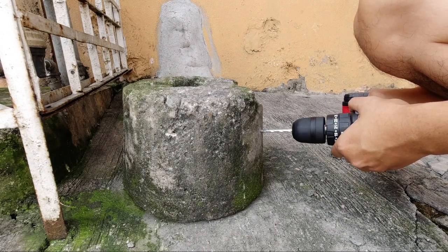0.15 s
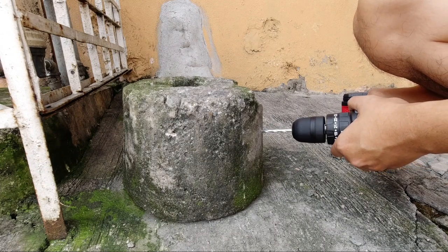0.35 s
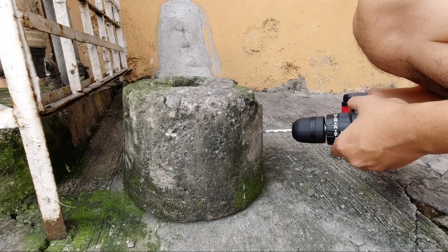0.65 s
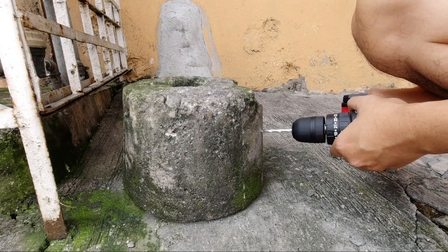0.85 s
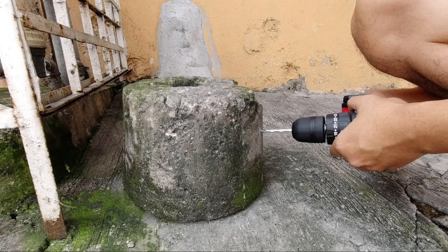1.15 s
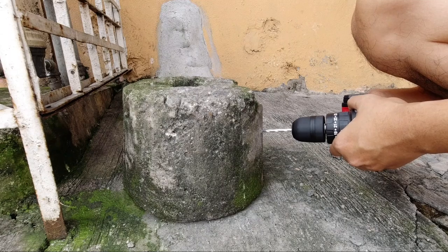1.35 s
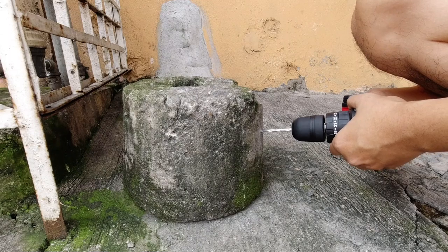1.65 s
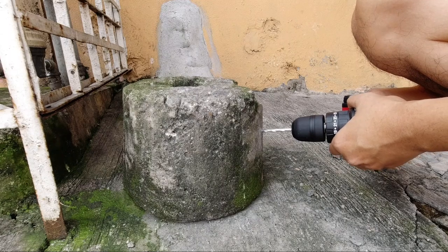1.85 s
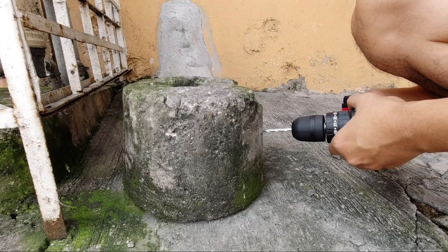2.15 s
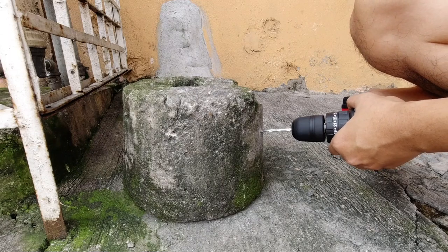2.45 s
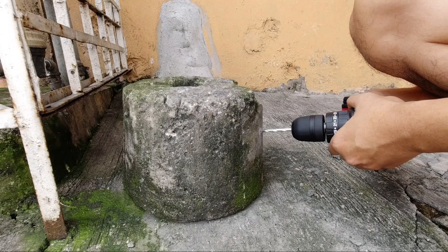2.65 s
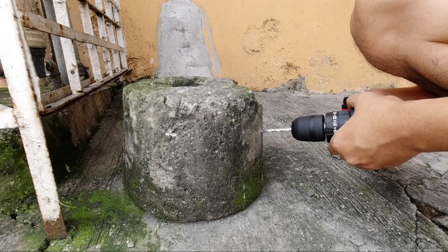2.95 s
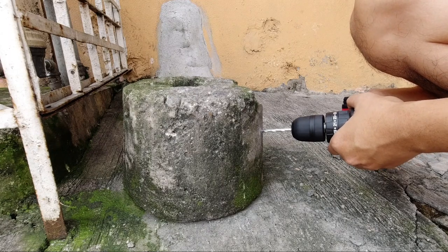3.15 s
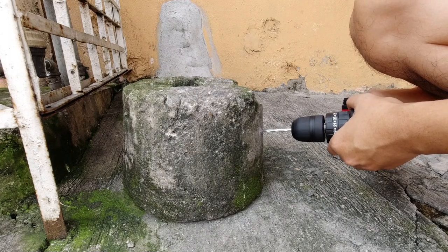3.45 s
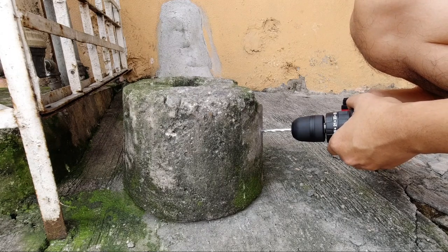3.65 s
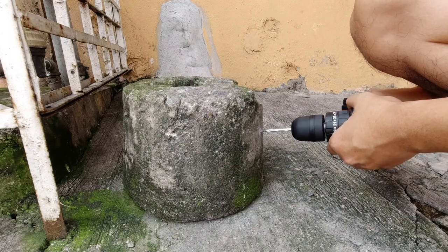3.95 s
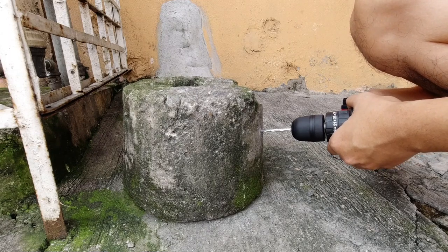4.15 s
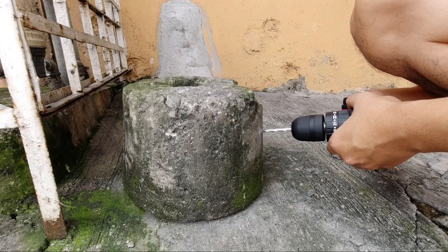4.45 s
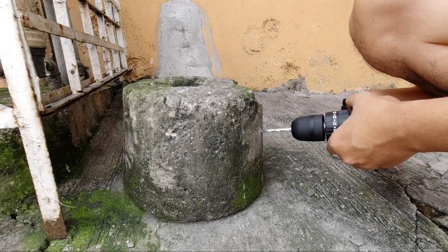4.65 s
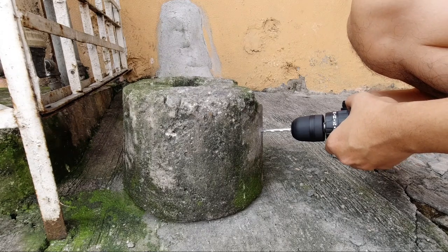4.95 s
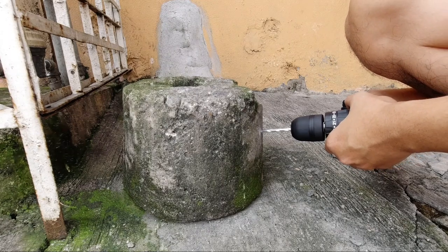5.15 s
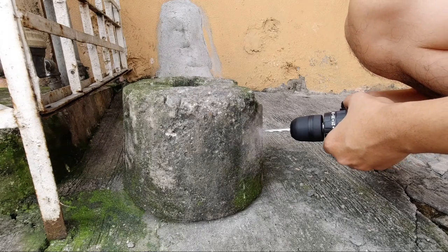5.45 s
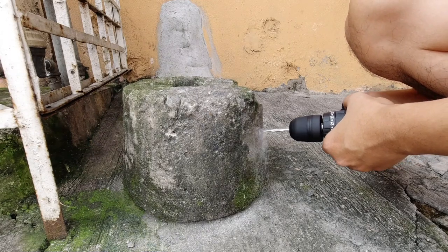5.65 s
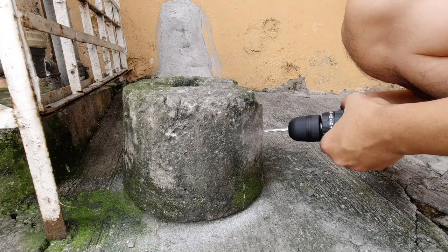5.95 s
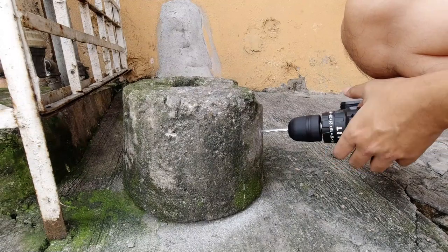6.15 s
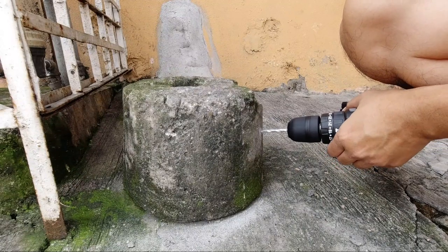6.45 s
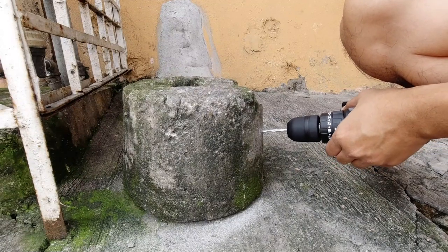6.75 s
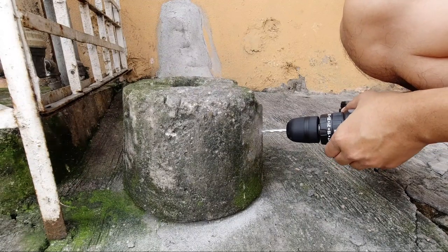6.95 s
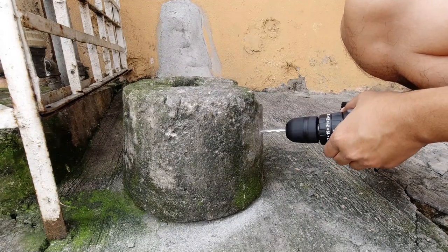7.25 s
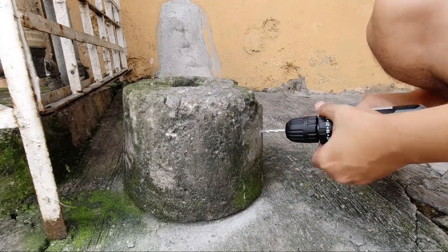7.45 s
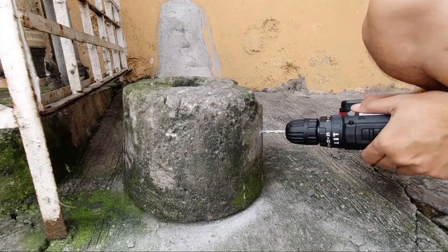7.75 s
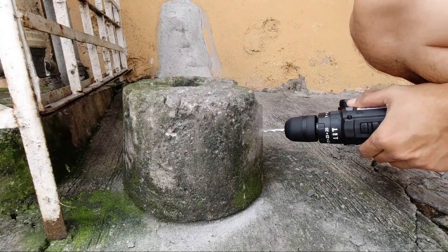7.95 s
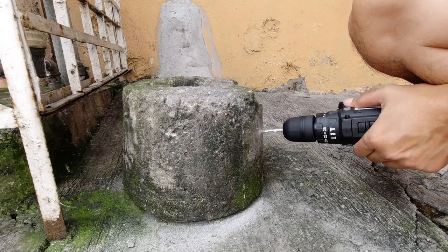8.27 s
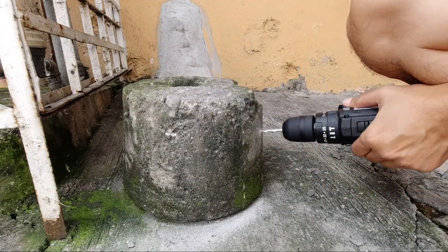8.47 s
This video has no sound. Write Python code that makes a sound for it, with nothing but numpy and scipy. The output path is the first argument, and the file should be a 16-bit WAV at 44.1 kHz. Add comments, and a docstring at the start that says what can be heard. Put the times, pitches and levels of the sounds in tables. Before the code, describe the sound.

Close stereo sound of hammer drilling in a quiet yard. The ratchet makes a dense, raspy mid-pitched buzz, fluttering with each turn, over hissing concrete grit and a thin coarse whine. Past halfway it loses its brightness and wobbles, with a few sharp squeaks. A brief stop exposes soft hums, grip rustle, small casing ticks and faint outdoor rumble before the buzz returns, uneven, to the end.

```python
"""First comes a harsh buzz: a cordless hammer drill in a yard, boring into a concrete block before a stereo microphone.
Its ratchet strikes about 15 blows a turn at first: a stack of tones at multiples of the blow rate, with noise
for the grit crushed at every blow, a rough high whine and brief squeaks. It drops to a duller, unsteady sound,
pauses once and restarts. Low rumble, wind on the ports and faint air are filtered noise behind it;
two soft hums, hand rustle and casing ticks are short bursts of noise in the pause."""
import sys
import numpy as np
from scipy import signal
from scipy.fft import rfft, irfft, next_fast_len
from scipy.io import wavfile

SR = 44100
rng = np.random.default_rng(int(sys.argv[2]) if len(sys.argv) > 2 else 0)


def transcribe(u):
    """Save the signal u as a 16-bit wav file named by the first command-line argument.

    u: samples, shape (n,) or (channels, n), limited to [-1, 1]; the rate is SR.
    q: integer samples, one column per channel.
    """
    v = np.clip(np.atleast_2d(u).T, -1, 1)
    q = np.round(v * 32767).astype(np.int16)
    wavfile.write(sys.argv[1], SR, q)


N = 379701
T = np.arange(N) / SR   # time of every sample [s]


def amp(db):
    """Turn dB into gain."""
    return 10 ** (np.asarray(db) / 20)


def rms_one(x):
    """Scale to rms 1."""
    return x / np.sqrt(np.mean(x ** 2) + 1e-20)


def in_time(*tables):
    """Join tables in time and read each column after the first at every sample."""
    seconds, *columns = np.vstack(tables).T
    return [np.interp(T, seconds, column) for column in columns]


def at_hz(points, hz):
    """Read a spectrum on a log-frequency axis."""
    points = np.array(points)
    return np.interp(np.log(hz + 1), np.log(points[:, 0]), points[:, 1])


def shaped(x, gain):
    """Filter by a gain that is a function of Hz."""
    size = next_fast_len(N)
    hz = np.arange(size // 2 + 1) * SR / size
    return irfft(rfft(x, size) * gain(hz), size)[..., :N]


def drift(rate_hz):
    """Slow random motion of rms about 1: noise twice through a one-pole low-pass, at a 20th of the sample rate."""
    pole = np.exp(-40 * np.pi * rate_hz / SR)
    slow = signal.lfilter([1], [1, -2 * pole, pole * pole], rng.standard_normal(N // 20 + 3002))
    slow = slow[3000:]   # leave out the filter's run-in
    return np.interp(np.arange(N) / 20, np.arange(len(slow)), rms_one(slow))


def window(start, end, edge):
    """1 between two times, with straight ramps of length edge [s]."""
    return np.clip((T - start) / edge, 0, 1) * np.clip((end - T) / edge, 0, 1)


# Low outdoor rumble: (frequency [Hz], relative density [dB per Hz])
RUMBLE_SPECTRUM = [(50, -19.5), (75, -9), (110, -1), (150, -6.5), (200, -2), (270, -4), (340, -18),
                   (600, -71)]
# Rumble and wind in time: (time [s], rumble level [dB], wind on the ports [dB, before a 2.5 dB cut])
RUMBLE_AND_WIND = [(0.0, -46, -65), (0.31, -41, -55), (0.91, -49, -63), (0.93, -42, -47), (1.29, -48, -59),
                   (1.32, -43.5, -49.5), (2.01, -45, -44.5), (7.38, -51.5, -62), (8.61, -46, -56.5)]
# Faint air of the quiet yard: (frequency [Hz], relative density [dB per Hz])
YARD_AIR = [(180, -26), (300, -9), (367, -2), (730, -7), (1090, -13), (1370, -13.5), (6000, -36.5),
            (7800, -98), (13200, -120)]
# Soft hums in the pause: (start [s], end [s], centre [Hz], width [Hz], level [dB])
PAUSE_HUMS = [(7.526, 7.596, 283, 50, -51), (7.643, 7.723, 483, 110, -48)]
SIDE_DB, AIR_DB, WIND_HZ = -20.5, -67.5, 46   # side of rumble and wind, yard air; wind turns over


def yard():
    """Background at the microphone: noise shaped into rumble, port wind, air and two short hums."""
    rumble_db, wind_db = in_time(RUMBLE_AND_WIND)
    rumble = shaped(rng.standard_normal((2, N)), lambda hz: amp(at_hz(RUMBLE_SPECTRUM, hz)))
    wind = shaped(rng.standard_normal((2, N)), lambda hz: hz / (1 + (hz / WIND_HZ) ** 5))
    mid, side = amp(rumble_db) * rms_one(rumble) + amp(wind_db - 2.5) * rms_one(wind)
    air = shaped(rng.standard_normal((2, N)), lambda hz: amp(at_hz(YARD_AIR, hz)))
    for start, end, centre, width, db in PAUSE_HUMS:
        hum = shaped(rng.standard_normal(N), lambda hz: 1 / (1 + (2 * (hz - centre) / width) ** 4))
        mid = mid + amp(db) * window(start, end, edge=0.0078) * rms_one(hum)
    side = amp(SIDE_DB) * side
    return amp(AIR_DB) * rms_one(air) + np.array([mid + side, mid - side])


# Hands on the grip in the pause: (time [s], level [dB])
GRIP_RUSTLE = [(7.42, -62), (7.49, -68), (7.53, -69), (7.58, -65), (7.62, -68), (7.69, -63), (7.73, -70.5),
               (7.78, -72)]


def rustle(fade_s):
    """Hands rub the grip: short soft puffs of dull noise around 1.1 kHz."""
    level = sum(amp(db) * np.exp(-((T - s) / fade_s) ** 2) for s, db in GRIP_RUSTLE)
    dull = shaped(rng.standard_normal((2, N)), lambda hz: 1 / (1 + ((hz - 1100) / 350) ** 2) + 0.044)
    return level * rms_one(dull)


# Faint ticks of the casing: (time [s], level of the noise before its low-pass [dB])
CASING_TICKS = [(7.579, -65), (7.600, -68), (7.617, -62), (7.702, -65), (7.783, -68)]
TICK_S = .003   # falls to 1/e this far either side of its peak


def ticks():
    """The casing ticks: tiny broad bursts of noise."""
    level = sum(amp(db) * np.exp(-((T - s) / TICK_S) ** 2) for s, db in CASING_TICKS)
    return level * shaped(rng.standard_normal((2, N)), lambda hz: 1 / (1 + (hz / 5500) ** 6))


# Brief high squeaks: (time [s], centre [Hz], level [dB])
HIGH_SQUEAKS = [(5.86, 9700, -41), (6.06, 10040, -37), (6.125, 13800, -26.5), (6.255, 10550, -38)]
SQUEAK_WIDTH_HZ, SQUEAK_RISE_S, SQUEAK_S = 690, .012, .065


def squeaks():
    """Short narrow bands of noise that rise fast and fade."""
    out = 0
    for s, centre, db in HIGH_SQUEAKS:
        band = shaped(rng.standard_normal(N), lambda hz: 1 / (1 + (2 * (hz - centre) / SQUEAK_WIDTH_HZ) ** 4))
        rise = np.clip((T - s) / SQUEAK_RISE_S, 0, 1)
        fade = np.clip(1 - (T - s) / SQUEAK_S, 0, 1)
        out = out + amp(db) * rise * fade * rms_one(band)
    return out


# Rough high whine: (time [s], pitch [Hz], level over the grinding [dB])
WHINE_PATH = [(0, 7480, -14.5), (1.5, 7810, -15), (4.6, 7770, -20.5), (6.2, 7330, -18), (6.27, 7430, -6.5),
              (6.6, 7700, -16), (7.4, 7700, -12), (7.9, 7460, -14.5), (8.61, 8040, -15)]
WHINE_DRIFT_HZ = 140


def whine(hz):
    """A narrow band of noise around a slowly moving pitch: a tone with random amplitude and phase."""
    rough = drift(WHINE_DRIFT_HZ) + 1j * drift(WHINE_DRIFT_HZ)
    return np.real(rough * np.exp(2j * np.pi * np.cumsum(hz) / SR))


# Four stretches of drilling, firm, unsteady, regripped, restarted:
# (start [s], timing scatter [blows], speed wobble [blows per s], level wobble [dB], lowest tone over level [dB],
#  low grit [dB], body grit [dB], grinding [dB], each grit over its range's level)
DRILLING_STRETCHES = [(0, 0.01, 0.36, 1.03, -5, -2.5, 0.41, -2), (4.6, 0.05, 5.0, 0.6, -8, -4, -0.035, -5),
                      (6.25, 0.036, 2.8, 0.4, -8, -4, -1.3, -4.5), (7.6, 0.061, 8.0, 1.5, -10, -4, 0, -1.5)]


def by_stretch(values):
    """One value a stretch, held until the next begins."""
    starts = np.array(DRILLING_STRETCHES)[:, 0] * SR
    return np.asarray(values)[np.searchsorted(starts, np.arange(N), side="right") - 1]


# Colour of the crushed grit, within each range: (frequency [Hz], relative density [dB per Hz])
GRIT_SPECTRUM = [(200, -26), (330, -17), (490, -19.5), (750, -7), (1000, -14.5), (1500, -7.5), (2300, -1),
                 (2550, -9.5), (3200, -11), (4400, -13), (5000, -20.5), (7000, -24.5), (10000, -19),
                 (15500, -17.5)]
# Ringing of bit and chuck: (centre [Hz], width [Hz], relative level [dB, before ring_db])
BIT_RINGS = [(9920, 570, 8), (11000, 270, 15.5), (12700, 310, 11.5), (14600, 400, -2)]
# How wide the grit sounds: (frequency [Hz], side to middle [dB])
GRIT_WIDTH = [(200, -12), (700, -21), (1500, -8), (3000, -8), (5000, -2), (8000, -0.5), (15000, -5.5)]


def grit_colour(hz, ring_db):
    """Spectrum of the crushed grit, with the resonances of bit and chuck."""
    rings = sum(amp(db + ring_db) / (1 + (2 * (hz - c) / w) ** 2) for c, w, db in BIT_RINGS)
    return amp(at_hz(GRIT_SPECTRUM, hz)) * (1 + rings)


def grit(blows, swell_db, burst, sharp, blow_db, ring_db, body_hz, swell_hz):
    """Grinding noise; each blow adds a burst of its own strength and the body ring swells; middle and side."""
    strength = rng.normal(0, 1, int(blows.max()) + 2)[blows.astype(int)]
    decay = sharp * np.exp(-sharp * (blows % 1))
    pulse = (1 - burst + burst * decay) * amp(blow_db * strength)
    flicker = amp(0.67 * drift(29.0) + 0.28 * drift(170))
    noise = flicker * rng.standard_normal((2, N))
    # the pulse acts mostly below body_hz
    noise = noise + (pulse - 1) * shaped(noise, lambda hz: 1 / (1 + (hz / body_hz) ** 2))
    body_ring = shaped(noise, lambda hz: 1 / (1 + ((hz - swell_hz) / 1500) ** 4))
    mid, side = noise + (amp(swell_db) - 1) * body_ring
    mid = shaped(mid, lambda hz: grit_colour(hz, ring_db))
    side = shaped(side, lambda hz: grit_colour(hz, ring_db) * amp(at_hz(GRIT_WIDTH, hz)))
    return np.array([mid, side])


# Overtones of the buzz: (multiple of the blow rate, level over its range in each of the 4 stretches [dB],
#  extra before the bit seats [dB], swell [0-1], lean of the swell, double-rate swell [0-1])
BUZZ_OVERTONES = [(2, 3.3, 0.5, 1.5, 1.5, -1.5, 0.31, 1, 0.0073),
                  (3, 2.1, -1, -3, -5, -3.5, 0.32, -0.79, 0.33),
                  (4, 0, -1.5, -1.5, -2, -7, 0.036, -0.57, 0.047),
                  (5, -4, -2.5, -6.5, 0, -5.5, 1, -0.92, 0.37), (6, 0, -3, -2, -14.5, 2.5, 0.63, -0.47, 0),
                  (7, -11.5, -15, -12, -3.5, -1.5, 0.37, 0.25, 0),
                  (8, -27, -19.5, -12.5, -18, 14.5, 0.13, .1, 0.22),
                  (9, -22, -12, -30, -26, -4.5, 0.14, -0.023, 0.1)]
LOWEST_SWELL = 0.11
SEAT_S = 0.99   # the bit seats with this time constant


def buzz(blows, turn, depth, scatter, levels_db, flutter_db, slip, spread):
    """Regular part of the blows; the bit runs off true, so the tones swell as it turns."""
    lowest_db, low_db, body_db, level_db = levels_db
    # real part: level flutter; imaginary part: phase slip
    wander = [scatter * (flutter_db * np.log(10) / 20 * drift(25) + 1j * slip * drift(25)) for _ in range(3)]
    lowest = np.real(np.exp(2j * np.pi * blows + 2.0 * wander[1]))
    out = amp(lowest_db) * (1 + LOWEST_SWELL * np.cos(turn)) * lowest
    unseated = np.exp(-T / SEAT_S)
    for k, *db, early_db, once, lean, twice in BUZZ_OVERTONES:
        k = round(k)
        base_db = low_db if k < 4 else body_db if k < 7 else level_db
        once_swell = once * (np.cos(turn) + 1j * lean * np.sin(turn))
        swell = 1 + depth * (once_swell + twice * np.cos(2 * turn))
        phase = 2 * np.pi * k * blows - spread * k * k   # higher tones lag in the body
        tone = np.real(swell * np.exp(1j * phase + wander[k % 3]))
        out = out + amp(by_stretch(db) + early_db * unseated + base_db) * tone
    return out


# Lag of the left port behind the right, scaled down in stereo(): (frequency [Hz], relative phase lag)
PORT_LAG = [(100, .03), (400, .12), (1300, 0.42), (2300, 1.4), (3300, 0.56), (4800, 2.9), (6000, 0.33)]


def stereo(mid, side):
    """The left port of the microphone hears the middle a little later than the right."""
    def turned(scale):
        return shaped(mid, lambda hz: np.exp(scale * .5j * at_hz(PORT_LAG, hz)))
    return np.array([turned(-0.43) + side, turned(1.0) - side])


# Ratchet speed before the drop, until the pause, after it: (time [s], speed [blows per s])
RATCHET_SPEED = [
    [(0.0, 403.7), (0.09, 400), (0.47, 403), (1.23, 394), (2.04, 394), (2.9, 391), (3.39, 393.5),
     (3.71, 389), (4.23, 391.5), (4.59, 394)],
    [(4.63, 389.3), (5.0, 387), (5.2, 394.3), (5.42, 377), (5.44, 380), (5.57, 392), (5.74, 375.7),
     (6.08, 373), (6.16, 403), (6.48, 370), (6.59, 381.5), (6.88, 369.8), (7.26, 388), (7.38, 375.5)],
    [(7.86, 390), (7.96, 386), (8.134, 354), (8.174, 400), (8.268, 364), (8.556, 373), (8.58, 370)],
]
# Loudness in the same three parts: (time [s], level [dB], body ring 1.4-2.5 kHz over level [dB],
#  low overtones 0.6-1.35 kHz over level [dB])
DRILL_LEVEL = [
    [(0.03, -15, -4, -8.5), (0.51, -13.5, -2.5, -11), (0.78, -13.5, -3, -10), (1.52, -13, -4, -9),
     (3.67, -13.5, -2, -8.5), (4.59, -14, -1.5, -8.5)],
    [(4.62, -22, -5, -9), (4.64, -18.5, -1.5, -9.5), (5.5, -18.5, -5.5, -8.5), (5.52, -17.5, -3.5, -20),
     (5.54, -18.5, -5, -8.5), (5.93, -18.5, -2.5, -9.5), (6.02, -17, -6.5, -8.5), (6.22, -25, -1, -10),
     (6.26, -19.5, -3, -7), (6.73, -18.5, -2, -9), (7.38, -19.5, -2.5, -6)],
    [(7.86, -23.5, -2.5, -6), (7.924, -20.5, -5, -4.5), (8.166, -20, -9.5, -8), (8.206, -19.5, -1.5, -6.5),
     (8.438, -19, -7, -4.5), (8.486, -18, -2, -5.5), (8.6, -20, -10.5, -5.5)],
]
# Treble of the grit: (time [s], 8-10 kHz level [dB], level above 10 kHz [dB])
TREBLE_LEVEL = [(0, -27, -22), (3, -26, -22), (4.59, -28, -28), (4.61, -38, -37), (4.88, -43, -45),
                (5.09, -90, -52), (7.4, -90, -52), (7.83, -35, -27.5), (8.19, -31.5, -28), (8.44, -39, -37),
                (8.61, -52, -54)]
# Depth of the swell: (time [s], depth [0-1.5])
SWELL_IN_TIME = [(0, 1.03), (1.2, .8), (3, 0.66), (4.62, 0.94), (6.2, 0.2), (8.61, 0.1)]
WOBBLE_HZ, BUILD_DB = 9.0, -5   # the lowest tone builds up from BUILD_DB as the bit seats
GRIT_SWELL_DB = 1.4   # at depth 1
# the spindle starts a little fast and settles
TURNS_PER_S, EXTRA_TURNS_PER_S, SETTLE_S = 26.0, 1.11, .65
# the swell comes once a turn, then slower once the drilling is unsteady; offsets in cycles
FIRST_TURN, SLOW_TURN, SLOW_SWELLS_PER_S = 0.098, .5, 9.25
EARLY_THROB_DB, EARLY_THROB_S = 0.5, .6   # the level throbs with each turn until the bit seats
# the trigger is let go, then pulled again; the yard rings on briefly
PAUSE_FROM_S, PAUSE_TO_S, STOP_S, START_S = 7.400, 7.824, 0.0058, 0.03
TAIL_DB, TAIL_S = -19, 0.011


def grit_in_ranges(crush, levels_db):
    """Split the grit into five ranges by frequency, each at its own level."""
    edges = [(0, 1), (1350, 300), (2550, 200), (8300, 100), (10350, 200), (SR, 1)]   # (edge [Hz], slope width [Hz])
    out = 0
    for (low, a), (high, b), db in zip(edges, edges[1:], levels_db):
        band = shaped(crush, lambda hz: np.clip((hz - low) / a + .5, 0, 1) * np.clip((high - hz) / b + .5, 0, 1))
        out = out + amp(db) * band / band[0].std()
    return out


def trigger():
    """Gain of the drill: it stops fast, rings on in a short tail, and starts again."""
    since, until = T - PAUSE_FROM_S, T - PAUSE_TO_S
    tail = amp(TAIL_DB) * np.exp(-np.maximum(since, 0) / TAIL_S)
    return np.clip(np.maximum(1 - since / STOP_S, until / START_S), tail, 1)


def drill():
    """Hammer drill in concrete: buzz and grit follow one count of blows, with whine and squeaks on top."""
    (per_s,), (level_db, body_db, under_db) = in_time(*RATCHET_SPEED), in_time(*DRILL_LEVEL)
    (whine_hz, whine_db), (depth,), (treble_db, top_db) = map(in_time, (WHINE_PATH, SWELL_IN_TIME, TREBLE_LEVEL))
    columns = np.transpose(DRILLING_STRETCHES)[1:]
    scatter, wobble, wobble_db, lowest_db, low_db, ring_db, grind_db = map(by_stretch, columns)

    spindle = TURNS_PER_S + EXTRA_TURNS_PER_S * np.exp(-T / SETTLE_S)
    swells_per_s = np.where(by_stretch([1, 0, 0, 0]), spindle, SLOW_SWELLS_PER_S)
    offset = by_stretch([FIRST_TURN, SLOW_TURN, SLOW_TURN, SLOW_TURN])
    turn = 2 * np.pi * (offset + np.cumsum(swells_per_s) / SR)

    level_db = level_db + EARLY_THROB_DB * np.exp(-(T / EARLY_THROB_S) ** 2) * np.cos(turn)
    per_s = per_s + wobble * drift(WOBBLE_HZ)
    body_db = level_db + body_db + wobble_db * drift(WOBBLE_HZ)
    under_db = level_db + under_db
    lowest_db = level_db + lowest_db + BUILD_DB * np.exp(-T / SEAT_S) + wobble_db * drift(WOBBLE_HZ)
    grind_db = level_db + grind_db
    jitter = scatter * (drift(25) + 0.095 * drift(150))
    blows = np.maximum(np.cumsum(per_s) / SR + jitter, 0)

    crush = grit(blows, GRIT_SWELL_DB * depth * np.cos(turn), burst=0.3, sharp=2.2, blow_db=1.0,
                 ring_db=-11.0, body_hz=4480, swell_hz=2400)
    crush_mid, crush_side = grit_in_ranges(crush, [under_db + low_db, body_db + ring_db, grind_db, treble_db, top_db])
    tones = buzz(blows, turn, depth, scatter, (lowest_db, under_db, body_db, level_db),
                 flutter_db=19.5, slip=13.2, spread=0.253)
    tones = tones + amp(grind_db + whine_db) * whine(whine_hz) + squeaks()
    return trigger() * stereo(tones + crush_mid, crush_side)


def scene():
    """The yard behind, hands and casing in the pause, and the drill in front."""
    return yard() + rustle(fade_s=0.023) + ticks() + drill()


CUTOFF_HZ = 15560


def record(dry):
    """Clip peaks at full scale, cut the top steeply, and clip again."""
    cut = signal.ellip(12, .3, 70, CUTOFF_HZ, fs=SR, output="sos")
    return np.clip(signal.sosfilt(cut, np.clip(dry, -1, 1)), -1, 1)


dry = scene()
out = record(dry)
transcribe(out)
```